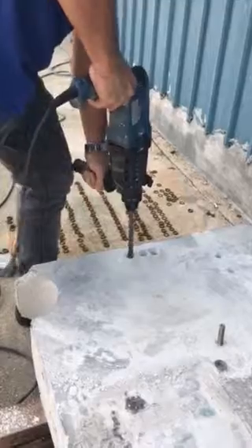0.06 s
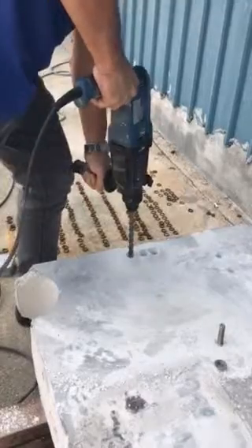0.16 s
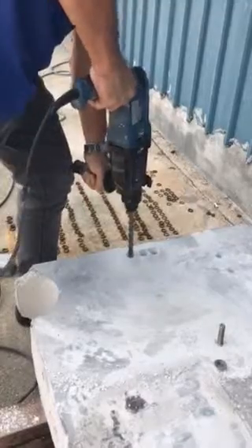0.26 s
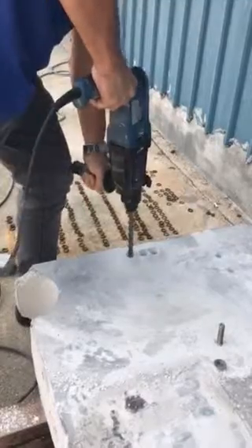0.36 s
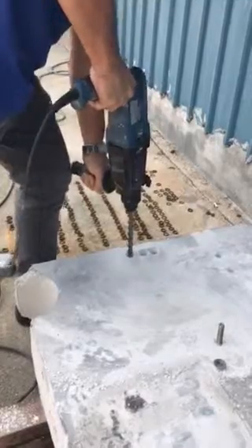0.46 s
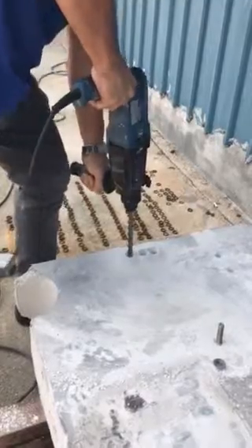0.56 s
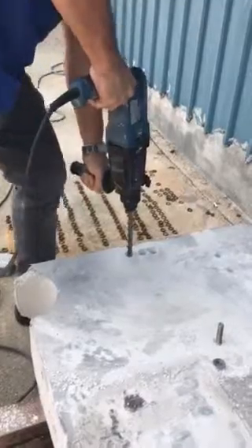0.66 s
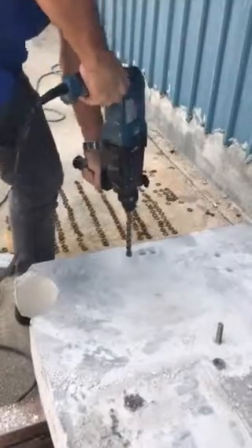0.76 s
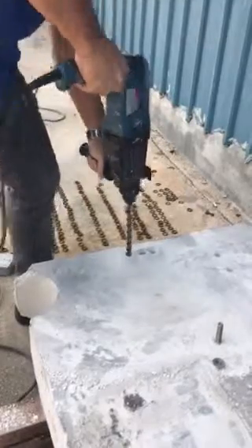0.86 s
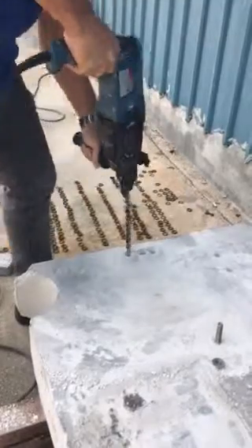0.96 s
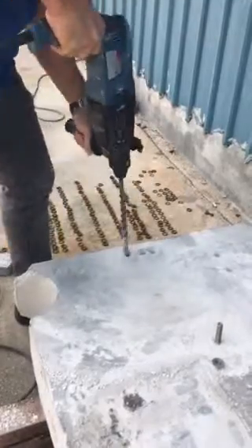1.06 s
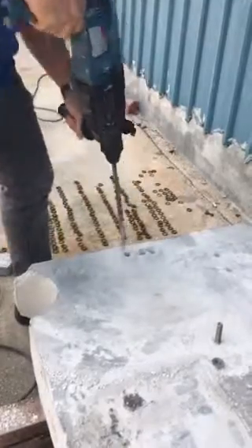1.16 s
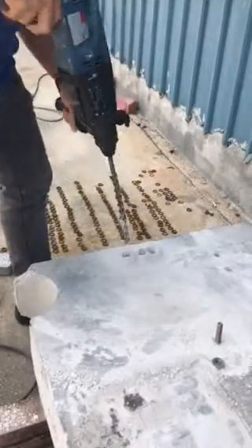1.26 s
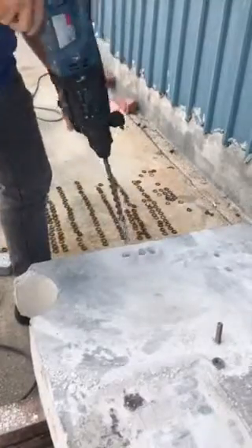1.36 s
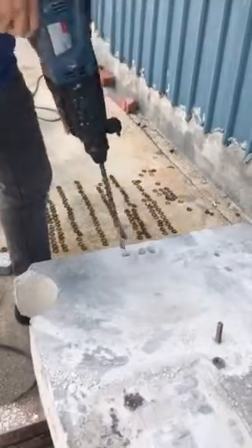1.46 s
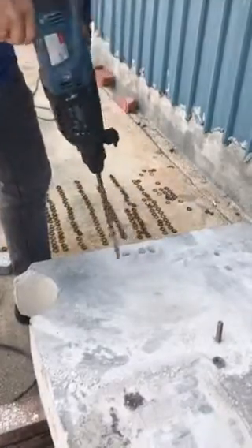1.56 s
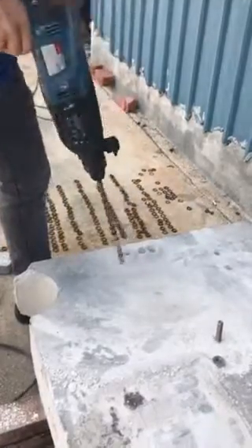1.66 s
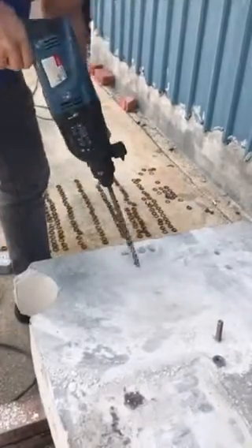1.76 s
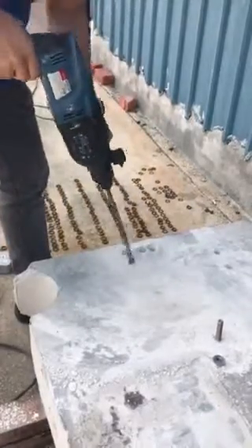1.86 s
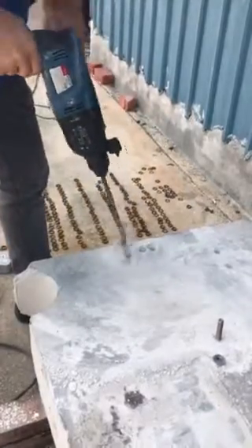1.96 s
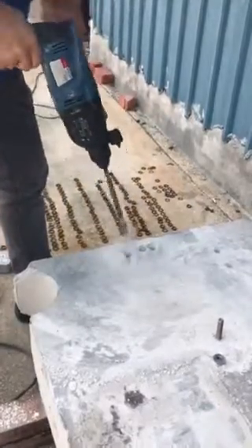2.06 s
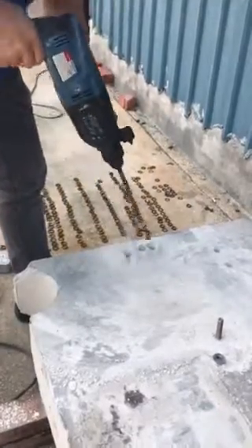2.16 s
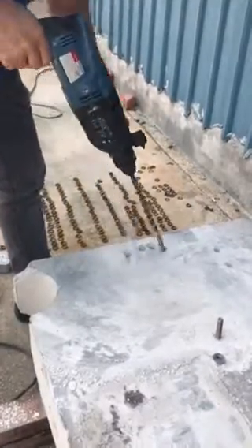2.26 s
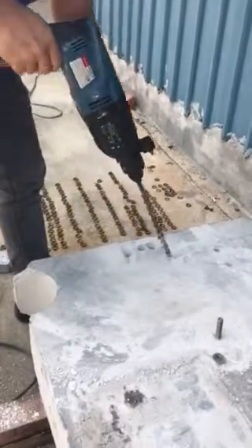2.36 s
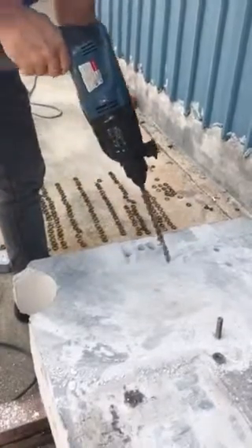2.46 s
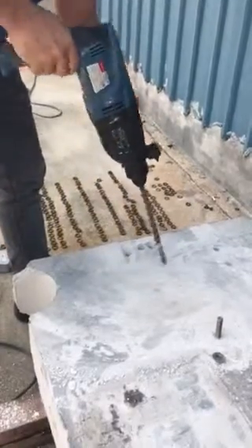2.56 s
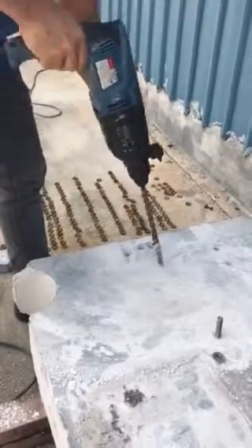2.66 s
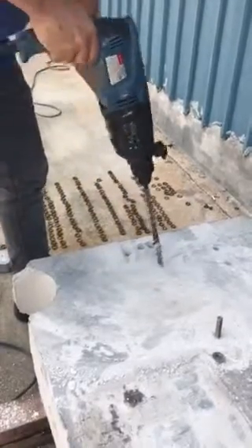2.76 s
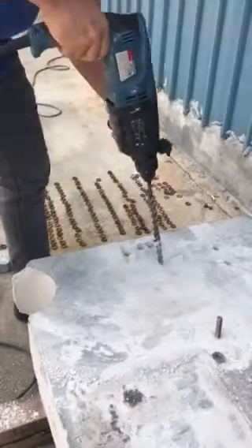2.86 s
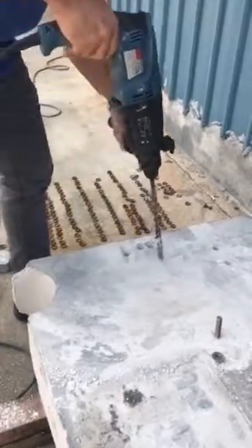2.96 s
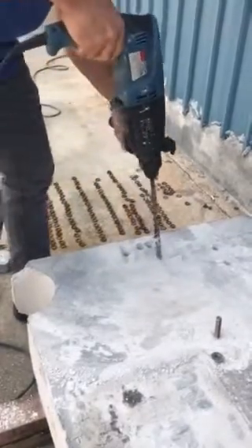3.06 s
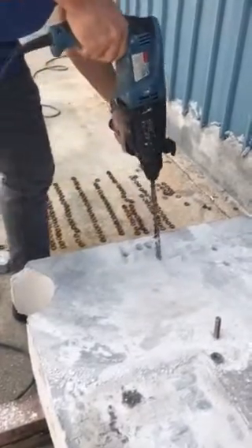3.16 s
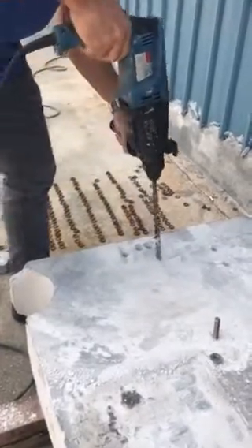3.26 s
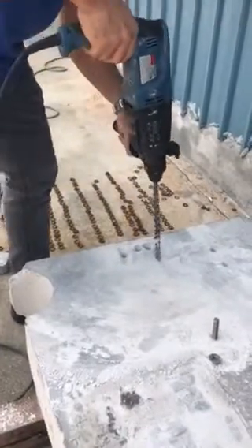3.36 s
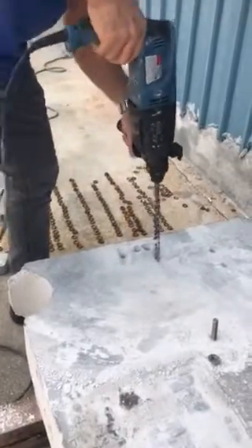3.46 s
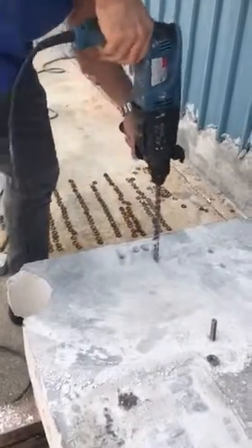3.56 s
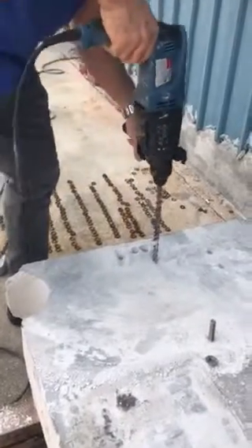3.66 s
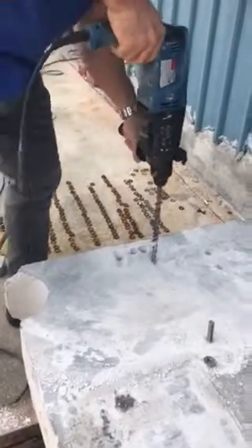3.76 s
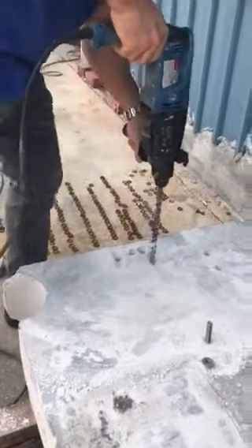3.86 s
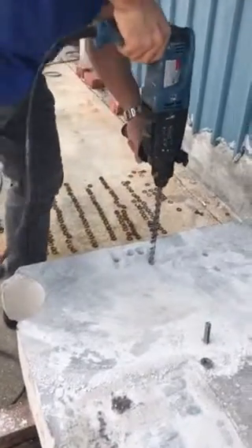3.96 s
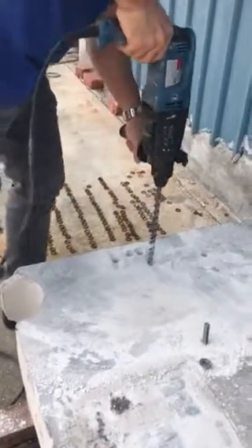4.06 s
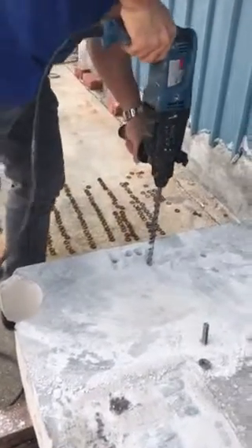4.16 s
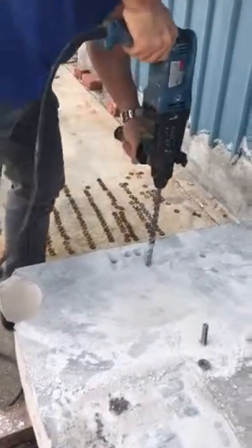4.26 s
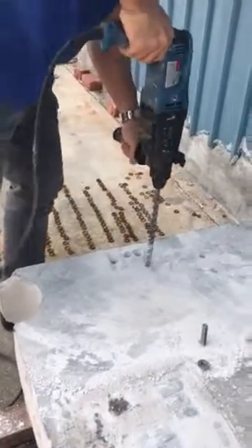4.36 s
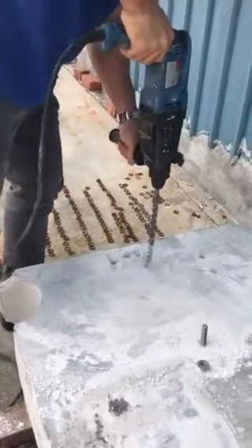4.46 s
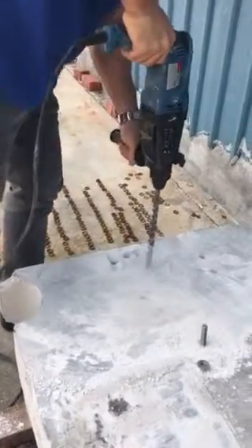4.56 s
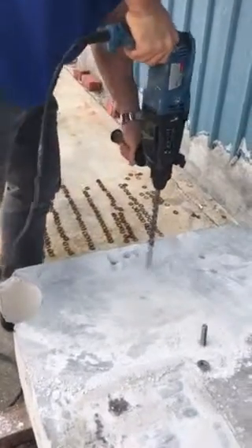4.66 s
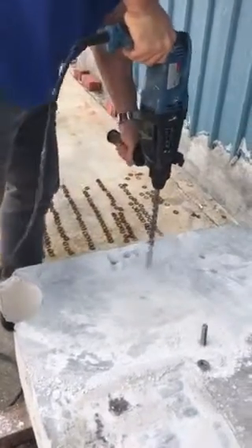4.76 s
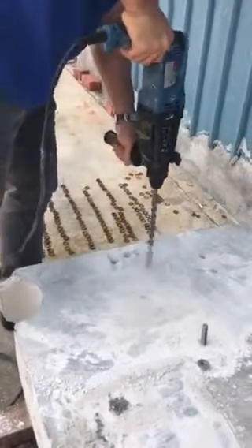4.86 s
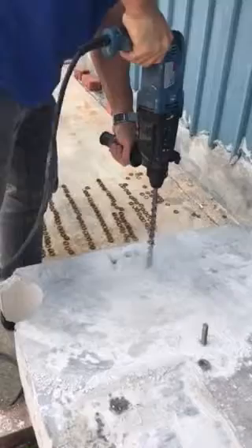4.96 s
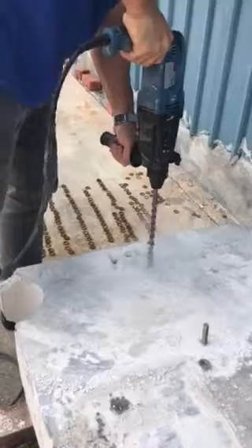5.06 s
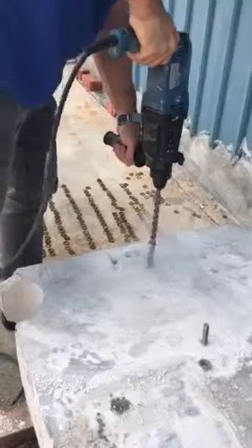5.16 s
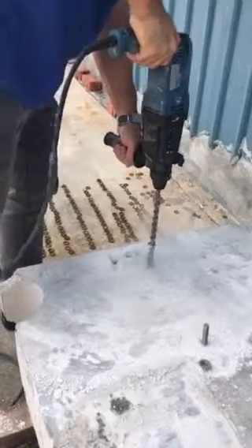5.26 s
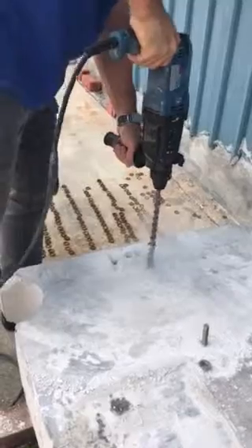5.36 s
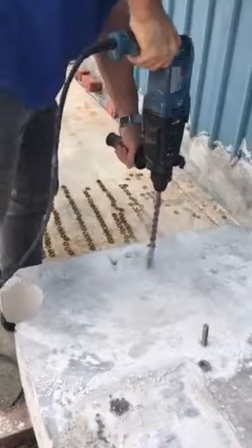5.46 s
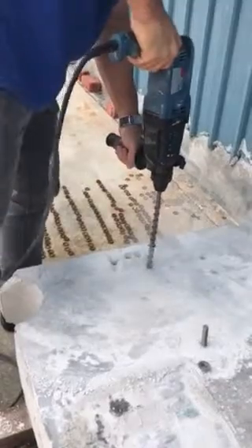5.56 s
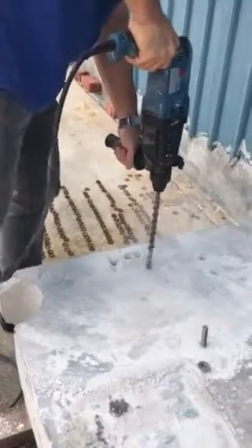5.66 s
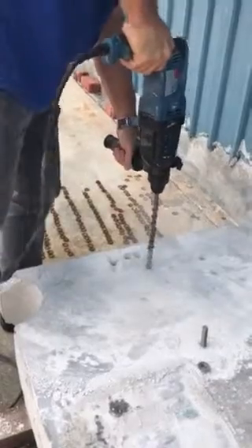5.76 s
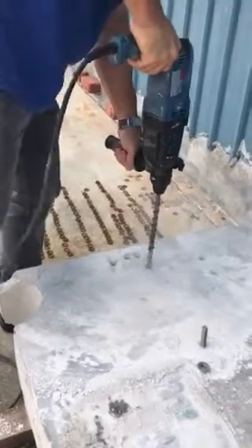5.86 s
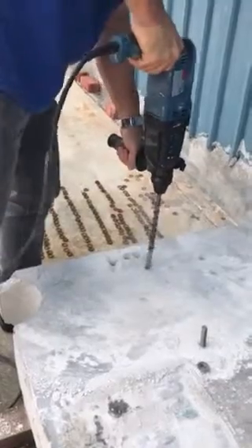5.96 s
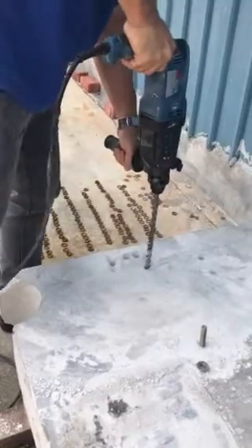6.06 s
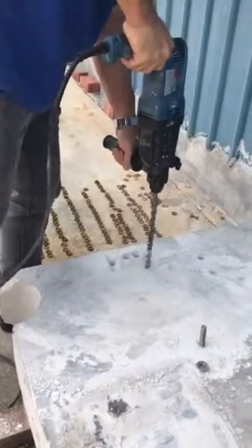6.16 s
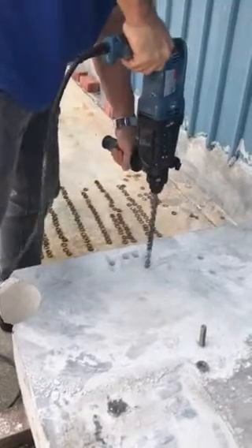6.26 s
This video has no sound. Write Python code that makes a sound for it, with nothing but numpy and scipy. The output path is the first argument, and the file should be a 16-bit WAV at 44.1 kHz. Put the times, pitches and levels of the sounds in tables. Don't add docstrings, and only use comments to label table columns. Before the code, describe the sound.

A hammer drill pounds concrete in a harsh rapid clatter, lifts, races and rattles down to a stop, then touches down and pounds again outdoors.

```python
import sys
import numpy as np
from scipy import signal
from scipy.fft import rfft, irfft, next_fast_len
from scipy.io import wavfile
from scipy.ndimage import uniform_filter1d, map_coordinates

SR = 44100
rng = np.random.default_rng(int(sys.argv[2]) if len(sys.argv) > 2 else 0)


def boost(x):
    u = np.asarray(x, float) / 20
    return 10 ** u


def persist_wave(psi):
    counts = np.round(np.clip(psi, -1, 1) * 32767).astype(np.int16)
    wavfile.write(sys.argv[1], SR, np.atleast_2d(counts).T)


N = 278271
TIME = np.arange(N) / SR
TOP_HZ = 15900
LIFTED_S, COASTING_S, SECOND_S, RESTART_S = .93, 1.96, 3.5, 4.35
LOADED = (TIME < LIFTED_S) | (TIME > RESTART_S)


def noise(count=N):
    return rng.standard_normal(count)


def unit(x):
    return x / np.sqrt(np.mean(x ** 2) + 1e-20)


def wobble(rate):
    coarse = map_coordinates(noise(int(N * rate / SR) + 4), [TIME[::32] * rate])
    return np.interp(TIME, TIME[::32], coarse)


def filtered(x, response):
    size = next_fast_len(len(x) + 8192)
    return irfft(rfft(x, size) * response(np.fft.rfftfreq(size, 1 / SR)), size)[:len(x)]


def colour(points):
    points_hz, db = np.transpose(points)
    return lambda hz: boost(np.interp(np.log(hz + 1), np.log(points_hz), db))


def modes(peaks, between_db=-120):
    def response(f):
        total = boost(between_db) / (1 + (3800 / (f + 1)) ** 8)
        for centre, width, db in peaks:
            total = total + boost(db) * 1j * f * width / (centre ** 2 - f ** 2 + 1j * f * width)
        return total
    return response


def delayed(x, seconds):
    return np.roll(x, shift=round(seconds * SR))


def attack_decay(t, t60, rise):
    return boost(-60 * t / t60) * (1 - np.exp(-t / rise))


def bursts(spikes, t60, rise):
    return signal.fftconvolve(spikes, attack_decay(TIME[:SR // 20], t60, rise))[:N] * noise()


def peak(at_s, rise_db_per_s, fall_db_per_s, hold_s=0):
    rise = rise_db_per_s * (TIME - at_s)
    fall = fall_db_per_s * (at_s + hold_s - TIME)
    return np.minimum(0, np.minimum(rise, fall))


# time_s, speed_turns_per_s
CRANK_SPEED = [(0, 63.87), (.398, 62.87), (.783, 61.61), (.896, 63.9), (1.168, 81.51), (1.223, 81.42),
               (1.467, 60.11), (1.751, 40.9), (2.165, 24.03), (2.482, 12.08), (2.85, 0), (4.255, 0),
               (4.37, 34.64), (4.462, 60.67), (4.601, 65.76), (4.903, 67), (6.02, 64.33), (6.31, 65.1)]


def crank(size):
    start_turn = -.446
    speed = np.interp(TIME, *np.transpose(CRANK_SPEED))
    return uniform_filter1d(start_turn + np.cumsum(speed) / SR, size=size, mode="nearest")


def blows(turns):
    at = np.flatnonzero(np.diff(np.floor(turns)) > 0)
    at = at[(at < COASTING_S * SR) | (at > RESTART_S * SR)]
    jitter = (.00006 * SR * noise(len(at))).astype(int)
    force = boost(1.1 * noise(len(at)))
    return np.bincount(np.clip(at + jitter, 0, N - 1), force, N)


# whirr_db, hiss_db, housing_blow_db, steel_blow_db
WORKING_LEVELS = [
    (-22, -27.5, -16, -18),
    (-23.5, -24.5, -20, -21.5),
    (-23.5, -28, -22, -15),
]
# extra_db, fade_s
LOUD_RESTART = [
    (9.5, 0.33),
    (10.5, 0.26),
    (15, 0.066),
    (4.16, 1),
]
# extra_db, build_up_s
RIM_BOUNCE = [
    (4.7, 0.034),
    (3, .04),
    (2.2, .2),
    (10, 0.093),
]


def effort(turns):
    stall_speed, working_speed = 9.2, 64
    run_down_db, spin_up_db = (13, 21.5, 3.5, 10), (30.4, 51, 18, .1)
    bite_s, lift_full_s, lift_free_s = 4.44, 0.85, 0.84
    speed = np.abs(np.gradient(turns)) * SR
    decades = np.log10(speed ** 2 / (speed + stall_speed) / (working_speed - stall_speed) + 1e-4)
    second = TIME >= SECOND_S
    level_db = np.transpose(WORKING_LEVELS)[:, (TIME >= LIFTED_S) * 1 + second]
    law_db = np.transpose([run_down_db, spin_up_db])[:, second * 1] * decades
    bite_db = [second * db * np.exp(-np.maximum(TIME - bite_s, 0) / fade_s) for db, fade_s in LOUD_RESTART]
    lift_db = [db * np.clip(1 + (TIME - lift_full_s) / build_s, 0, 1) * (TIME < lift_free_s)
               for db, build_s in RIM_BOUNCE]
    return level_db + law_db + bite_db + lift_db


def gear_whirr(turns, whirr_db):
    whirr_db = whirr_db - 40 * np.clip(TIME - 2.68, 0, None) * (TIME < SECOND_S)
    contact = np.diff(np.floor(3.4 * turns), prepend=0) > 0
    teeth = ~LOADED * (TIME > 1.7) * contact * boost(2.5 * rng.standard_exponential(N))
    ticks = boost(whirr_db + 5) * bursts(teeth, t60=0.0066, rise=0.00036)
    return boost(whirr_db - 2.0 + 0.87 * wobble(12)) * noise() + ticks


def housing_thud(spikes, thud_db):
    slack = spikes + boost(-6.5 + 2 * wobble(40)) * ~LOADED * delayed(spikes, 0.004)
    thud = bursts(spikes * LOADED, t60=0.035, rise=0.00074)
    thud = thud + 1.16 * bursts(slack * ~LOADED, t60=0.029, rise=0.0004)
    bare_knock = boost(thud_db + 15) * ~LOADED * np.roll(spikes, shift=40)
    return boost(thud_db) * thud + bare_knock


def fan_hiss(hiss_db):
    hiss_db = hiss_db - 51 * np.clip(TIME - 2.6, 0, None) * (TIME < SECOND_S)
    return boost(hiss_db - 2.5 + 1.2 * wobble(10)) * noise()


def crushed_grit(spikes, strike_db):
    crush = bursts(spikes, t60=0.039, rise=0.0009)
    return boost(strike_db) * 0.93 * filtered(crush, lambda f: 1 / (1 + (f / 10560) ** 4))


def bit_ping(spikes, strike_db):
    ping = bursts(spikes, t60=0.0093, rise=0.0005) + 7.6 * LOADED * np.roll(spikes, shift=44)
    chatter = boost(-20.0) * (np.abs(TIME - .893) < .027) * noise()
    return boost(strike_db) * ping + chatter


# delay_s, level_db over the blow
SECOND_HIT = [
    (0.0026, 4),
    (0.0025, 0.5),
]
# centre_hz, width_hz, level_db
TOP_MODES = [(9500, 1500, -9), (12500, 1500, 0), (15300, 1000, 1)]


def rebounds(spikes, strike_db):
    again = np.zeros(N)
    for (delay_s, db), on in zip(SECOND_HIT, [TIME < LIFTED_S, TIME > RESTART_S]):
        again += boost(db) * on * delayed(spikes, delay_s)
    return filtered(boost(strike_db + 2.5) * bursts(again, t60=0.021, rise=0.00041), modes(TOP_MODES))


# start_s, end_s
WORK_STAGES = [
    (0, .93),
    (.93, 1.98),
    (1.98, 3.5),
    (3.5, 6.4),
]
# frequency_hz, level_db (per Hz)
HOUSING_COLOUR = [
    [(59, -39.5), (100, -24), (189, -5.5), (220, -43), (313, -19), (460, -34.5), (622, -8), (699, -18.5),
     (978, -9), (1280, -13), (1790, -12), (2010, -10.5), (5500, -19), (7150, -54), (12100, -120)],
    [(30, -82), (59, -59.5), (100, -36), (124, -40), (152, -22.5), (423, -12.5), (601, -1), (723, -9),
     (946, 3), (1700, -0.5), (2010, 2.5), (3560, -2), (4570, -3.5), (5500, -14.5), (7150, -22),
     (12100, -120)],
    [(59, -43), (100, -21), (150, -38), (308, -20), (409, -16), (622, -6.5), (1240, -2.5), (1370, -3.5),
     (2420, 1), (3270, -7.5), (5500, -17.5), (7150, -17), (12100, -120)],
    [(59, -39.5), (100, -5), (189, 0.5), (227, -30), (264, -6), (492, -22.5), (582, -3), (748, -11.5),
     (1030, 0.5), (1260, -5.5), (1490, -1.5), (2260, -5), (5500, -13), (7150, -61), (12100, -120)],
]
# centre_hz, width_hz, level_db
STEEL_MODES = [
    [(6120, 560, -4), (7140, 290, -3.5), (8350, 380, -2), (9540, 370, -6.5), (12030, 320, -5.5),
     (12850, 400, 0), (15400, 120, 3.5)],
    [(4950, 2300, 0.5), (6600, 1200, -2.5), (9030, 1100, 2), (12140, 1740, -3), (14400, 1700, -13)],
    [(4080, 290, 13.5), (6140, 760, -3), (9230, 450, 5), (9360, 240, 6), (14500, 700, -7)],
    [(4230, 670, -10.5), (6000, 290, 0), (8290, 500, 1.5), (13070, 250, -2), (15100, 300, -5.5)],
]
# centre_hz, width_hz, level_db
SLAB_MODES = [(1795, 18, 2), (2370, 60, -8), (4300, 60, -7)]


def clatter(turns):
    whirr_db, hiss_db, thud_db, strike_db = effort(turns)
    spikes = blows(turns)
    dull = gear_whirr(turns, whirr_db) + housing_thud(spikes, thud_db)
    steel_sources = fan_hiss(hiss_db), crushed_grit(spikes, strike_db), bit_ping(spikes, strike_db)
    no_bass = lambda f: 1 / (1 + (900 / (f + 1)) ** 4)
    hiss, grit, ping = [filtered(x, no_bass) for x in steel_sources]
    hz, out = np.linspace(1, TOP_HZ, 2000), np.zeros(N)
    for (start, end), body, bit in zip(WORK_STAGES, HOUSING_COLOUR, STEEL_MODES):
        on = uniform_filter1d(((TIME >= start) & (TIME < end)) * 1., size=600, mode="nearest")
        part = slice(max(int((start - .1) * SR), 0), int((end + .1) * SR))
        paths = [(dull, colour(body)), (hiss, modes(bit, between_db=-4.5)), (grit, modes(bit, between_db=3.0))]
        for x, response in paths:
            gain = np.sqrt(np.mean(np.abs(response(hz)) ** 2))
            out[part] += filtered((on * x)[part], response) / gain
        for mode in bit:
            share = boost(9 + 2 * wobble(60)[part])
            out[part] += filtered((on * ping)[part] * share, modes([mode]))
    slab_ring = boost(7.0) * filtered(LOADED * dull, modes(SLAB_MODES))
    return out + rebounds(spikes, strike_db) + slab_ring


# multiple_of_blow_rate, level_db
FIRST_HARMONICS = [(1, -10), (2, -14), (3, 2), (4, -20), (5, -5.5), (6, -20), (7, -20.5), (8, -13.5),
                   (9, -11.5), (10, 1), (11, -27.5), (12, -12.5), (13, -11.5), (14, -10), (15, -11.5),
                   (16, -3), (17, -6.5), (18, -7), (19, -21), (20, -35), (21, -24), (22, -12.5), (23, -11),
                   (24, -38.5), (25, -21), (26, -28.5), (27, -15), (28, -15), (29, -30.5), (30, -30.5)]
# multiple_of_blow_rate, level_db
SECOND_HARMONICS = [(1, -4.5), (2, -11), (3, -4), (4, -10.5), (5, -15), (6, -14), (7, -16.5), (8, -14),
                    (9, 1.5), (10, -6), (11, -14), (12, -12.5), (13, -15), (14, -5.5), (15, 0.5),
                    (16, -0.5), (17, -1), (18, -4), (19, -32), (20, -37), (21, -5), (22, -4), (23, -2.5),
                    (24, -18), (25, -39), (26, -40), (27, -12), (28, -15), (29, -7), (30, -3.5)]
# seated_s, lifted_s, low_multiples_db, high_multiples_db, high_sag_db_per_s
DRONE_HOLES = [
    (-1, 0.91, -27, -26, 4.5),
    (4.5, 7, -35, -29.5, 3.5),
]
# frequency_hz, level_db, phase_wander_rad
CASING_TONES = [(1795, -34, .6), (2370, -40, 1.2), (4290, -41, 1.5)]


def drone(turns):
    sway = .008 * wobble(25)
    building = np.clip((4.62 - TIME) / .1, 0, 1) * (TIME > 4)
    out = np.zeros(N)
    periods, harmonics = [TIME < 1, TIME > 4], [FIRST_HARMONICS, SECOND_HARMONICS]
    for on, orders, hole, low_trim_db, high_trim_db in zip(periods, harmonics, DRONE_HOLES, [1.5, 5], [2.5, .5]):
        seated_s, lifted_s, low_db, high_db, sag_db = hole
        contact_db = peak(seated_s, 293.5, 293.5, lifted_s - seated_s)
        since = TIME - max(seated_s, 0)
        deepen_db = 5 * np.minimum(TIME - .45, 0.3)
        low = boost(low_db + low_trim_db + contact_db + deepen_db + 1.2 * wobble(14)) * (1 - building)
        high = boost(high_db + high_trim_db + contact_db - sag_db * np.minimum(since, 1) + 1.3 * wobble(14))
        for hz, db, wander in CASING_TONES:
            level = boost(db + contact_db - sag_db * since + 1.4 * wobble(8)) * on
            out += level * np.sin(2 * np.pi * hz * TIME + wander * wobble(25))
        for k, db in orders:
            level = (low if k < 7 else high)[on] * boost(db + 1.17 * wobble(12)[on])
            out[on] += level * np.sin(2 * np.pi * (k * turns[on] + rng.random()) + k * sway[on])
    return out


# frequency_hz, level_db (per Hz)
YARD_COLOUR = [(15, -37.5), (25, -13.5), (48, -4.5), (102, -7.5), (166, -23.5), (195, -13.5), (242, -20.5),
               (301, -16.5), (394, -27), (1190, -28.5), (5000, -41), (7110, -49.5), (10400, -54.5),
               (14800, -52), (16000, -66.5)]


def yard():
    swell_db = .8 * wobble(4)
    air = boost(-49.5 + swell_db) * unit(filtered(noise(), colour(YARD_COLOUR)))
    insect = boost(-77.5 + wobble(30)) * unit(filtered(noise(), modes([(7060, 450, 0)])))
    return air + insect


# start_s, peak_db
FLUTE_CATCHES = [(0.104, -11.5), (0.208, -19.5), (0.388, -11), (0.504, -19.5), (0.66, -23.5), (0.674, -21),
                 (0.753, -29), (0.807, -19.5), (4.512, -12.5), (4.528, -18.5), (4.545, -21), (4.637, -25),
                 (4.667, -24), (4.798, -20.5), (4.932, -14), (5.067, -20), (5.081, -14.5), (5.201, -21),
                 (5.217, -13.5), (5.366, -14.5), (5.493, -27), (5.628, -20.5), (5.907, -21), (6.037, -27),
                 (6.1816, -9), (6.296, -25)]


def thumps():
    out, t = np.zeros(N + SR), TIME[:SR // 10]
    chirp = np.sin(3.64 * np.log(1 + t / 0.00075) + 15 * t)
    wave = chirp * np.exp(-t / 0.015) * (1 - np.exp(-t / 0.00066))
    rock = np.sin(2 * np.pi * 62 * t) * np.exp(-t / 0.022) * (1 - np.exp(-t / 0.0054))
    wave = wave + 0.35 * rock
    for s, db in FLUTE_CATCHES:
        out[round(s * SR):][:len(t)] += boost(db + 3.0) * wave
    return out[:N]


# multiple_of_crank_rate, centre_s, span_s, level_db
WHINE_LINES = [(1, 1.25, .2, -57), (2, 1.2, .15, -53), (7, 1.22, .13, -36), (13, 1.04, .05, -34),
               (16.6, 1.2, .08, -31), (18.2, 1.95, .12, -44), (36.2, 2.15, .1, -40), (63, 2.2, .08, -39),
               (220, 2.32, .09, -41), (7.9, 1.29, .12, -32), (7.6, 1.12, .06, -35), (19, 1.06, .06, -32),
               (19, 1.55, .14, -31), (16, 1.72, .08, -36), (31, 1.3, .2, -34), (34.5, 1.52, .1, -33),
               (57, 1.17, .15, -33), (63, 1.17, .15, -33), (66, 1.88, .1, -36), (95, 2.07, .05, -33),
               (103, 2.15, .05, -35), (92, 2.23, .05, -36), (102, 2.31, .05, -40), (335, 2.48, .06, -47),
               (60, 1.18, .13, -33), (55, 1.12, .1, -34), (104, 1.78, .1, -33), (118, 1.86, .08, -36),
               (38, 1.5, .12, -33), (36.2, 2.6, .08, -50), (66, 1.24, .08, -34), (226, 1.62, .08, -37),
               (226, 1.8, .08, -37), (345, 1.81, .11, -34), (226, 2.33, .15, -43), (540, 2.15, .1, -47)]


def whines(turns):
    free = slice(int(.8 * SR), 3 * SR)
    out, t, turns = np.zeros(N), TIME[free], turns[free]
    for k, s, span, db in WHINE_LINES:
        depth = min(k / 65, .9) if k < 70 else .4
        throb = 1 + depth * np.cos(2 * np.pi * (turns - .15))
        blur = (.4 + .0075 * k) * wobble(150 + k)[free]
        level = boost(db + 2 * wobble(30)[free]) * np.exp(-((t - s) / span) ** 2)
        out[free] += throb * level * np.sin(2 * np.pi * k * turns + blur)
    return out


# start_s, peak_db, bright_db, low_db, ring_hz
HARD_TAPS = [(1.814, -9, -40, -62, 6170), (1.862, -22.5, -32, -58, 2400), (1.89, -21, -35, -64, 2300),
             (1.956, -11, -40, -60, 5700), (1.97, -18.5, -19.5, -33, 1930), (2.003, -17, -14, -31, 2670),
             (2.503, -19.5, -32.5, -41, 1870), (2.613, -20.5, -31, -40, 1900), (2.635, -36, -42, -35, 1830),
             (3.171, -42, -57, -51, 5800), (3.276, -37, -65, -60, 5100), (3.272, -37, -60, -36, 1030),
             (3.281, -43, -65, -60, 3480), (3.292, -38, -65, -60, 3520), (3.478, -24, -58.5, -43, 1015),
             (3.676, -23, -54, -60, 5800), (3.682, -36.5, -60, -38, 1400), (3.763, -32, -59, -60, 1890),
             (3.787, -50, -58, -62, 1070), (3.809, -49, -54, -58, 1070), (4.095, -50, -60, -56, 990),
             (4.252, -26.5, -42, -54, 1510), (4.279, -30.5, -50, -48, 996)]
# start_s, peak_db, bright_db, ring_hz
STRIKER_DROPS = [(2.05, -24, -27, 2570), (2.088, -21, -27, 2460), (2.132, -19, -23.5, 2300),
                 (2.175, -30, -29, 2120), (2.218, -21, -36, 2390), (2.242, -31, -32, 1990),
                 (2.293, -23, -30, 1910), (2.329, -17, -40, 6000), (2.515, -40, -40, 1900),
                 (2.352, -20.5, -30, 1010), (2.393, -26, -43, 1870), (2.42, -20.5, -31.5, 2420)]
# centre_hz, width_hz, level_db
CHUCK_MODES = [(5750, 350, 5), (8200, 410, -2.5), (12200, 700, -13)]


def knocks():
    dull, bright, low = np.zeros((3, N + SR))
    t = TIME[:SR // 8]
    shape = (boost(-60 * t / 0.027) + 0.067 * boost(-60 * t / 0.2)) * (1 - np.exp(-t / 0.00067))
    drops = [(s, db, bright_db, -68, hz) for s, db, bright_db, hz in STRIKER_DROPS]
    for s, db, bright_db, low_db, hz in drops + list(HARD_TAPS):
        at = slice(round(s * SR), round(s * SR) + len(t))
        ring = attack_decay(t, .008 + 32 / hz, .0008) * np.sin(2 * np.pi * hz * t)
        puff = min(1, 2500 / hz) ** 2 * shape * noise(len(t))
        dull[at] += boost(db + 3.0) * (0.69 * (hz / 1500) ** .5 * ring + 1.44 * puff)
        bright[at] += boost(bright_db + 5.5) * shape * noise(len(t))
        low[at] += boost(low_db + 10 - 60 * t / 0.24) * noise(len(t))
    broad = lambda centre_hz, width_hz: lambda f: modes([(centre_hz, width_hz, 0)])(f) ** 2
    crack = filtered(bright[:N], modes(CHUCK_MODES, between_db=-4.5))
    return filtered(dull[:N], broad(1350, 2770)) + filtered(low[:N], broad(210, 290)) + crack


def tip_scrape():
    land_s, stop_s = 3.68, 3.74
    grit_db = -51.5 + peak(land_s, 2000, 60, stop_s - land_s) - 6 * (TIME > stop_s)
    tip_modes = modes([(3000, 2600, .1), (9300, 690, -12), (14000, 2000, -11)])
    grit = filtered(boost(2.4 * wobble(540)) * noise(), tip_modes)
    hum = np.sin(2 * np.pi * 200 * TIME + .5 * wobble(40))
    return boost(grit_db) * unit(grit) + boost(-39.5 + peak(3.692, 900, 160)) * hum


def restart_boom():
    boom_db = -18 + peak(4.57, 48, 330) + peak(RESTART_S + 0.038, 293.5, 0)
    return boost(boom_db) * np.sin(2 * np.pi * 184 * TIME + 0.91 * wobble(30))


def scene():
    turns = crank(size=880)
    drilling = clatter(turns) + drone(turns)
    background = yard()
    contacts = thumps() + whines(crank(size=4410)) + knocks() + tip_scrape()
    return (drilling + background + contacts + restart_boom())[None]


def low_pass(x):
    return signal.sosfilt(signal.butter(12, 17160, fs=SR, output="sos"), x)


def record(dry):
    soft = dry[0] / (1 + np.abs(dry[0] / .8) ** 4) ** (1 / 4)
    bass_cut = lambda hz: (1j * hz / 45 / (1 + 1j * hz / 45)) ** 2
    band = lambda hz: np.clip((TOP_HZ - hz) / 150, 0, 1) * bass_cut(hz)
    return low_pass(filtered(soft, band)[None])


dry = scene()
out = record(dry)
persist_wave(out)
```